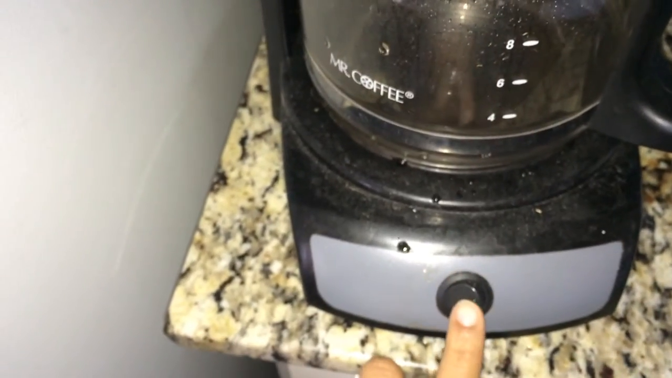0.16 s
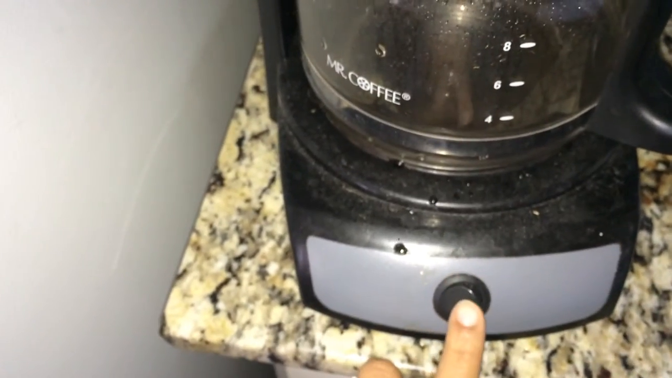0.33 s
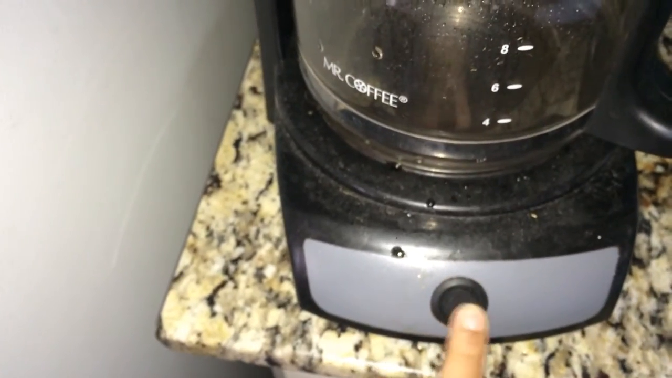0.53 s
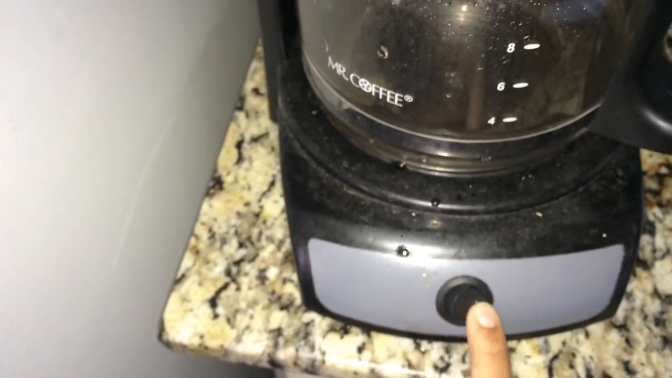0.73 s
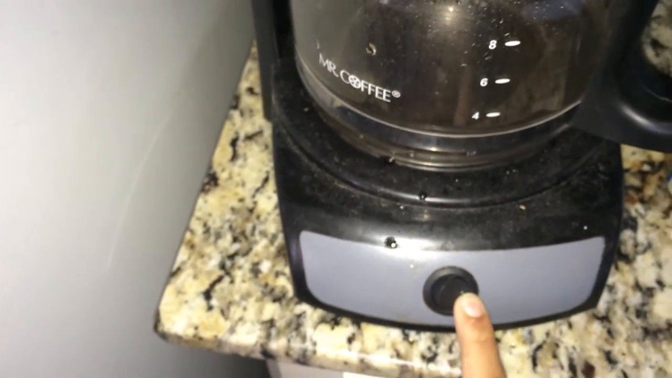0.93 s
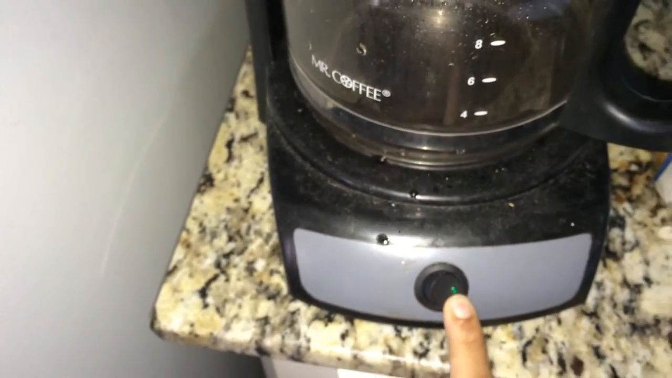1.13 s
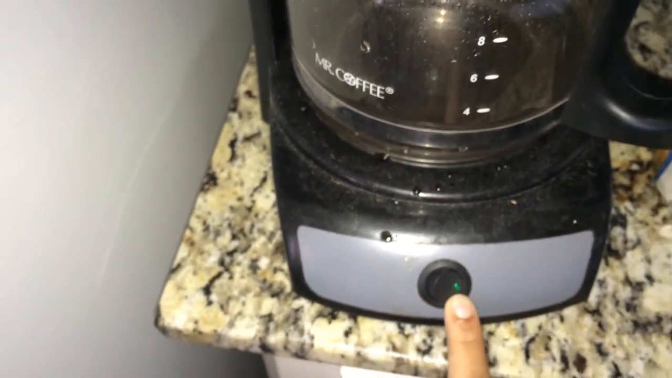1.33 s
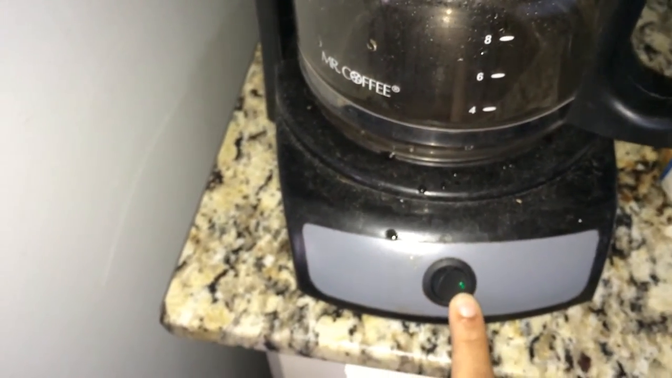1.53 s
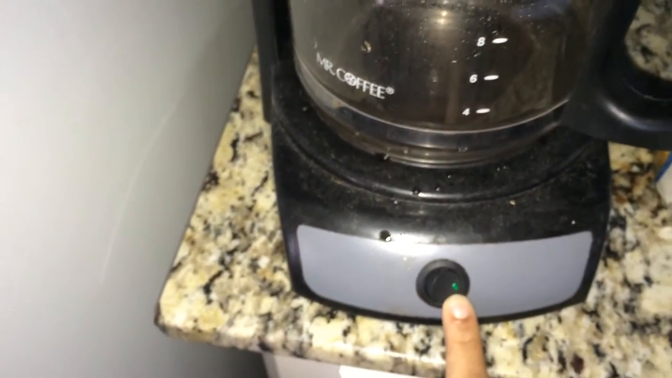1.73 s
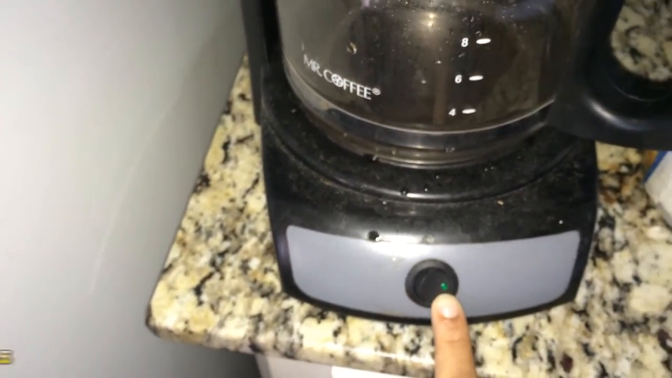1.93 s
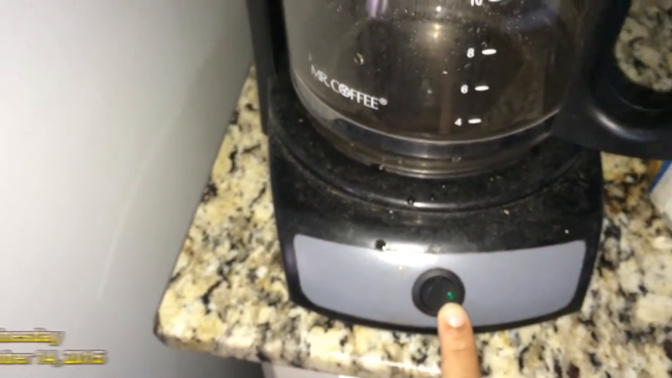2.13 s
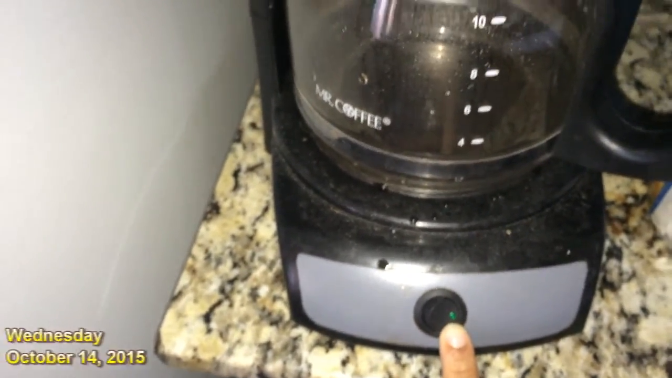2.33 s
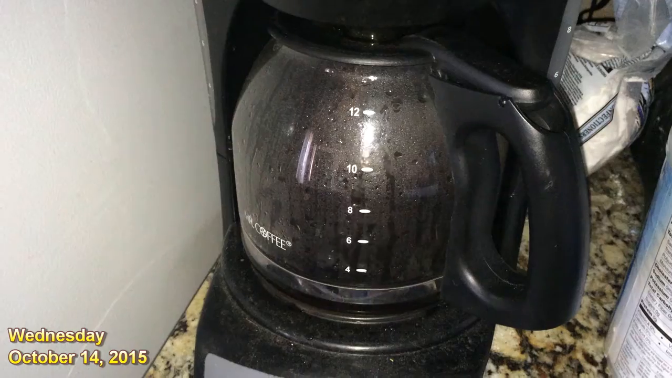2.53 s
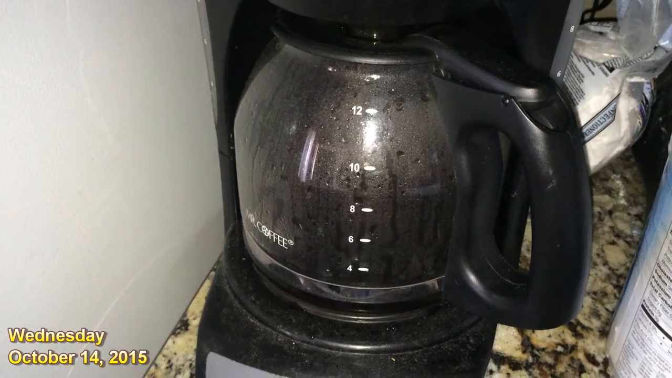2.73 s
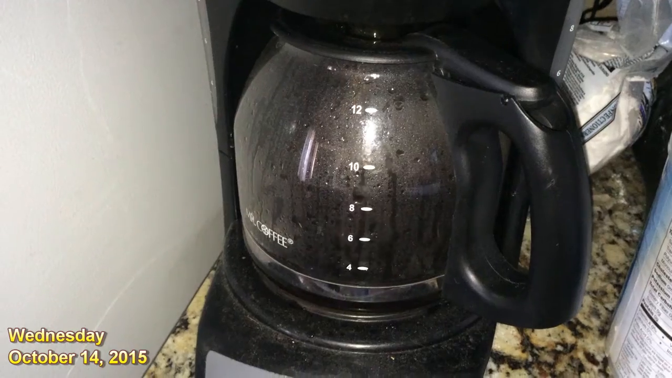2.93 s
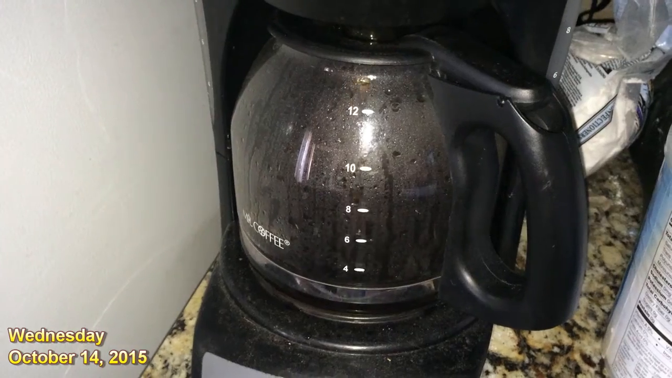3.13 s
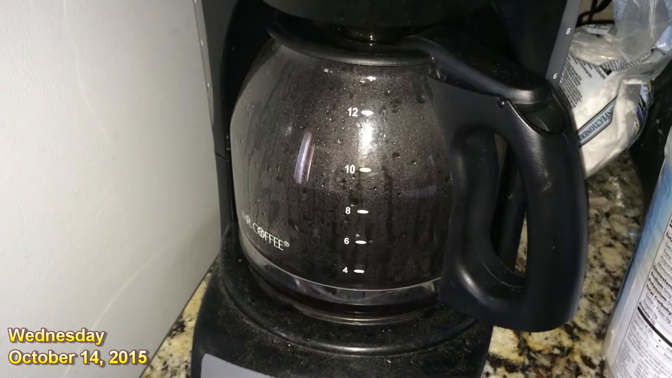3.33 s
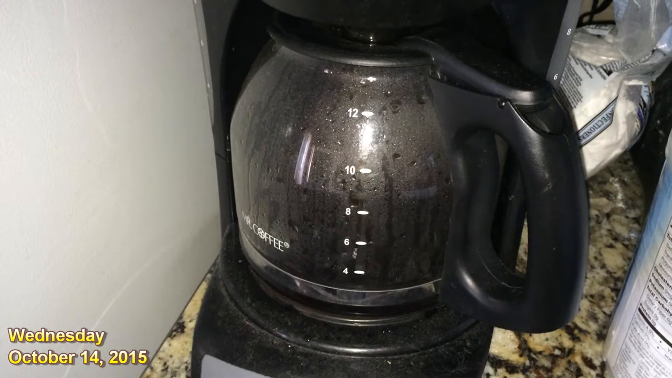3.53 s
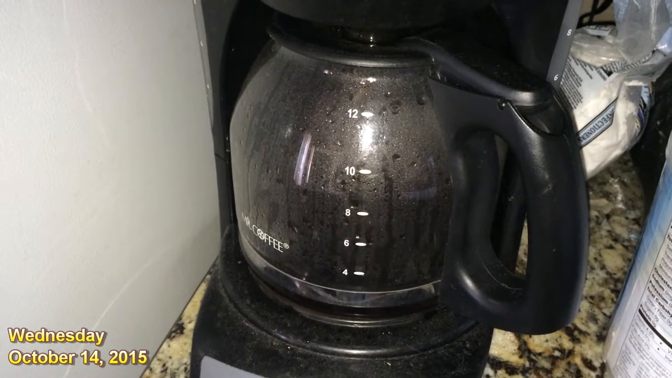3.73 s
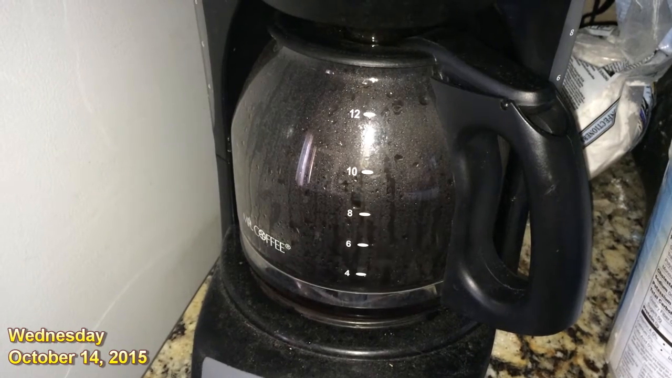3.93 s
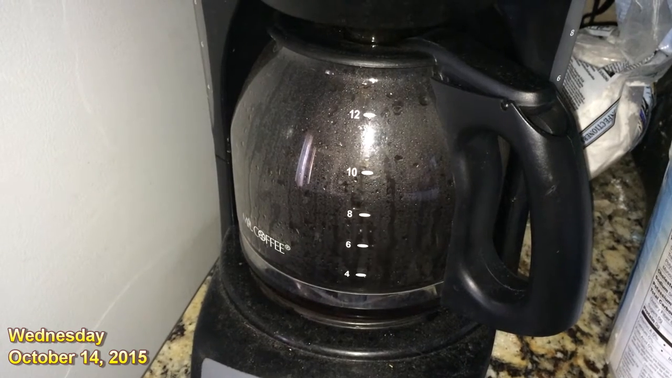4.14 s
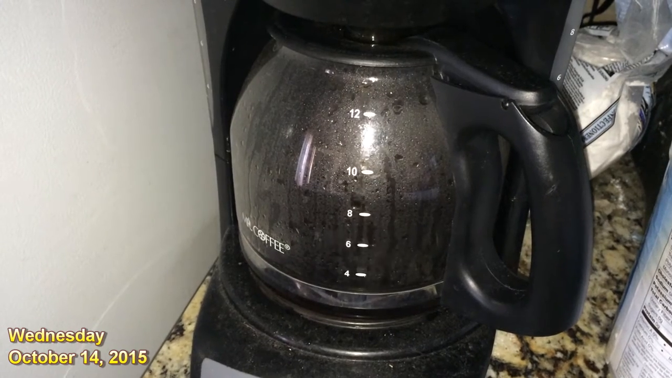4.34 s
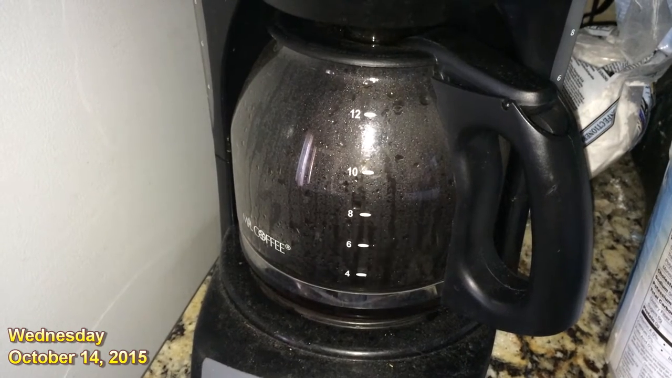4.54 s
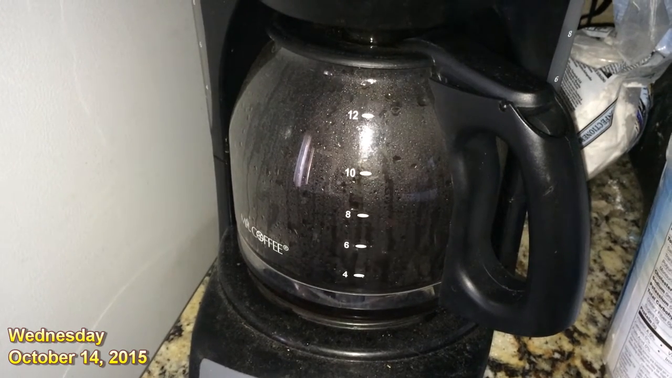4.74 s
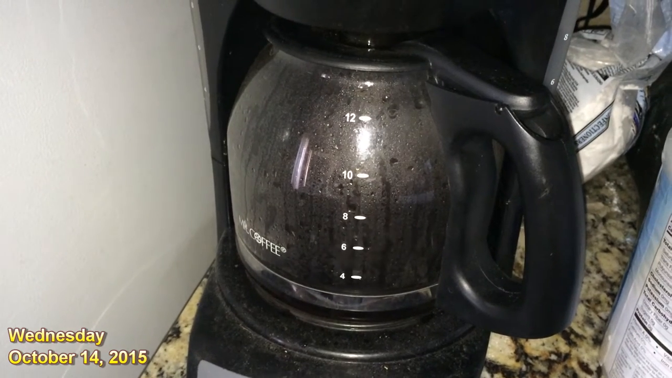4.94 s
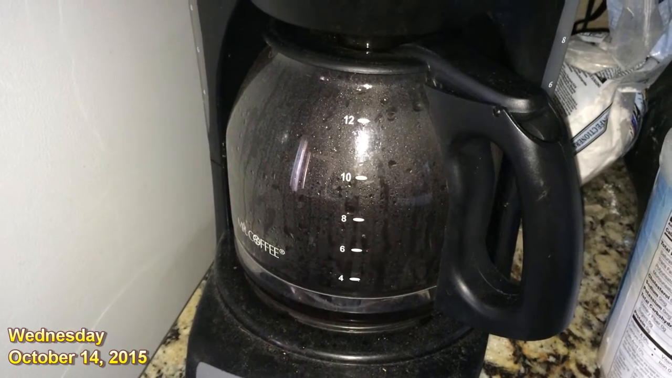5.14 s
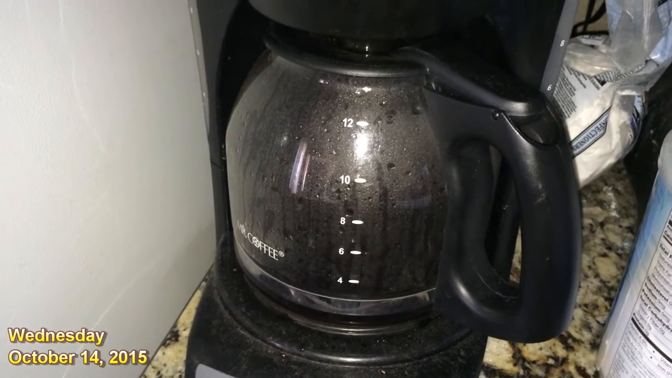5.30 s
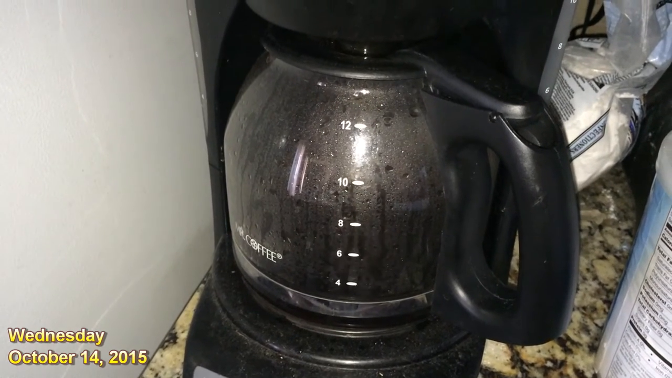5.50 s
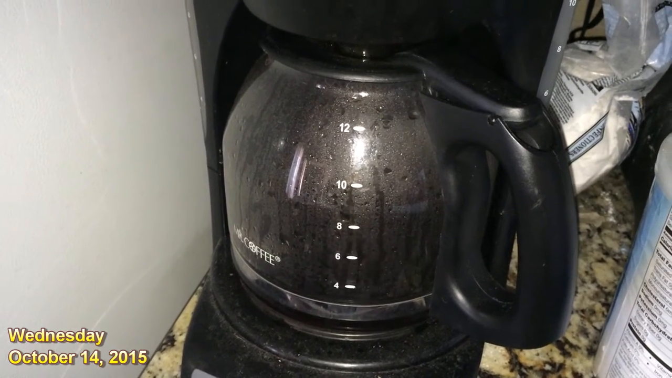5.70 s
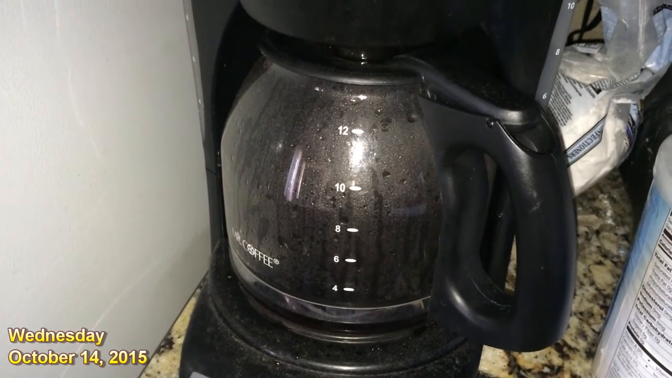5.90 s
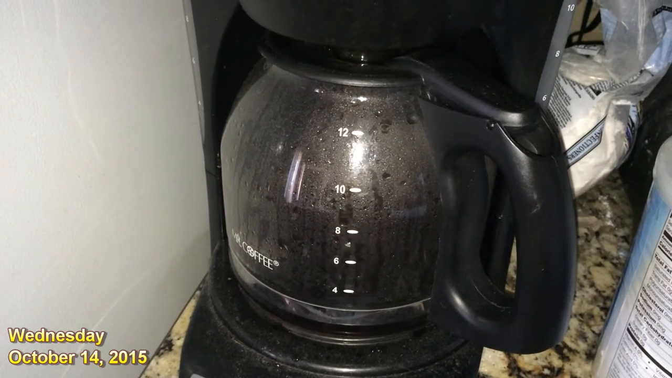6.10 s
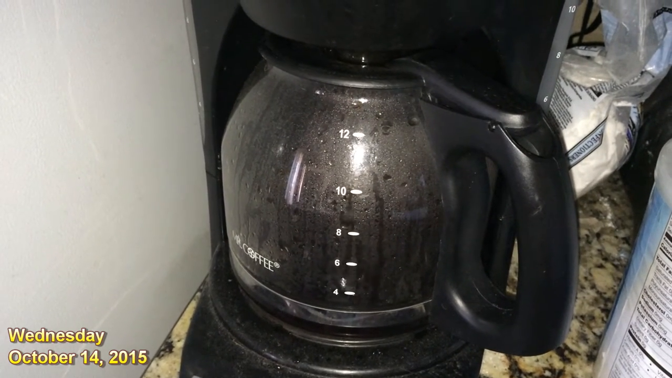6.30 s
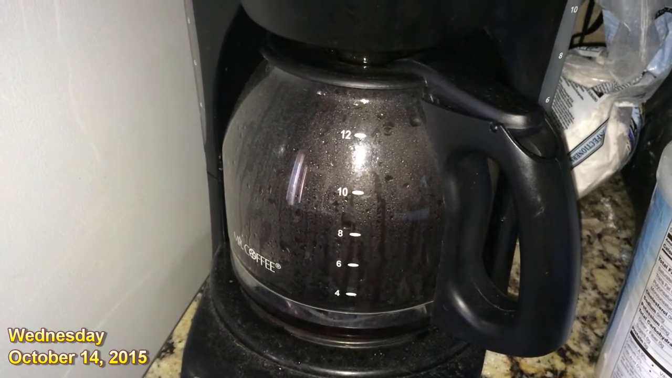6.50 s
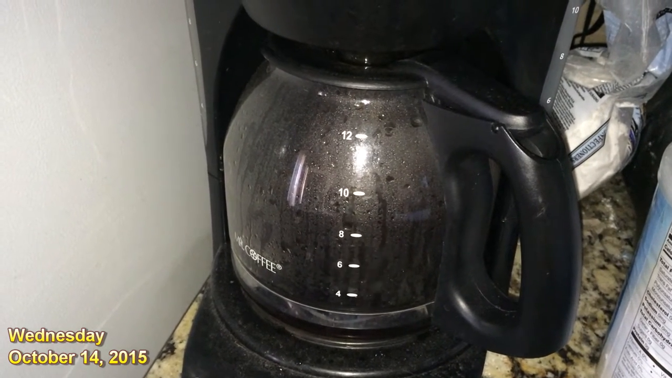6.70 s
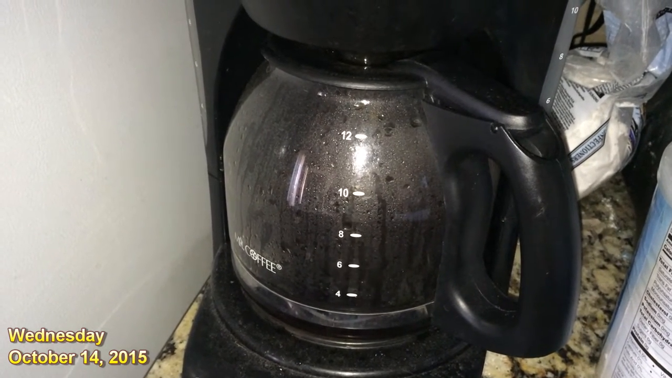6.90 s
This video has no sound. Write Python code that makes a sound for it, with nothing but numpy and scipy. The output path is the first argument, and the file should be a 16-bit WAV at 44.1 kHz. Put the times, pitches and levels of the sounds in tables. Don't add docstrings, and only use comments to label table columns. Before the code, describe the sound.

A plastic switch creaks and snaps loudly in a quiet humming kitchen, then a coffee maker gurgles, spits steam and drips into a glass carafe.

```python
import sys
import numpy as np
from scipy import signal
from scipy.fft import rfft, irfft
from scipy.io import wavfile

SR = 44100
rng = np.random.default_rng(int(sys.argv[2]) if len(sys.argv) > 2 else 0)


def level_to_linear(level):
    exponent = np.asarray(level, float) / 20
    return 10 ** exponent


def to_wav(sig):
    pcm = np.clip(np.atleast_2d(sig), -1, 1) * 32767
    pcm = np.round(pcm).astype(np.int16)
    wavfile.write(sys.argv[1], SR, pcm.T)


N = 306936


def curve(rows):
    s, value = np.transpose(rows)
    return np.interp(np.arange(N) / SR, s, value)


def rms_one(x):
    return x / np.sqrt(np.mean(x ** 2) + 1e-20)


def peak_one(x):
    return x / abs(x).max()


def add(out, s, sound):
    i = round(s * SR)
    out[i:i + len(sound)] += sound[:N - i]


def lasting(events, value):
    return [(*row, value) for row in events]


def drift(rate):
    r = np.exp(-80 * np.pi * rate / SR)
    draw = rng.standard_normal(N // 40 + 2002)
    slow = signal.lfilter([1], [1, -2 * r, r * r], draw)[2000:]
    return np.interp(np.arange(N) / 40, np.arange(len(slow)), rms_one(slow))


def resonate(x, hz, width_hz):
    r = np.exp(-np.pi * width_hz / SR)
    poles = [1, -2 * r * np.cos(2 * np.pi * hz / SR), r * r]
    return signal.lfilter(np.array([1, 0, -1]) * (1 - r * r) / 2, poles, x)


def modes_of(x, modes):
    return sum((-1) ** k * level_to_linear(db) * resonate(x + 1e-18, hz, w) for k, (hz, w, db) in enumerate(modes))


def shaken(x, modes, spread_db):
    strengths = spread_db * rng.standard_normal(len(modes))
    out = 0
    for k, (hz, w, db) in enumerate(modes):
        out = out + (-1) ** k * level_to_linear(db + strengths[k]) * resonate(resonate(x, hz, w), hz, w)
    return out


def coloured(spectrum, patchy_db):
    hz = np.arange(N // 2 + 1) * SR / N + 1
    corner_hz, db = np.transpose(spectrum)
    shaped = rfft(rng.standard_normal(N)) * level_to_linear(np.interp(np.log(hz), np.log(corner_hz), db))
    octave = np.log2(hz / 60).clip(0, 8)
    out = 0
    for k in range(9):
        band = irfft(shaped * (1 - abs(octave - k)).clip(0), N)
        out = out + band * level_to_linear(patchy_db * drift(13.0))
    return rms_one(out)


def puff(length, rough):
    t = np.arange(3600) / SR
    noise, lumps = rng.standard_normal((2, len(t)))
    grain = noise * np.exp(rough * lumps) / np.exp(rough ** 2)
    return grain * (1 - np.exp(-t / 0.00015)) * np.exp(-t / max(length, 5e-4))


def bursts(events, sharpness, gain_db, broad_db):
    out = np.zeros(N)
    for s, db, hz, length in events:
        air = puff(length, rough=0.093)
        body = resonate(resonate(air, hz, hz / sharpness), hz, hz / sharpness)
        broad = resonate(air, hz, 2.0 * hz)
        add(out, s, level_to_linear(db + gain_db) * (peak_one(body) + level_to_linear(broad_db) * peak_one(broad)))
    return out


# frequency in Hz, level in dB per Hz.
ROOM_TONE = [(15, -51.5), (25, -17), (87, -9), (108, -9.5), (145, -6), (166, -5), (200, -10.5), (344, -7),
             (439, -14), (476, -5.5), (560, -20), (1160, -20), (1560, -35), (14800, -47.5), (16000, -67.5)]
# frequency in Hz, width in Hz, level in dB.
FRIDGE = [(120.6, 110, -65), (176.7, 8.9, -59), (286.8, 26, -58), (470.4, 3.8, -62), (944, 3.9, -71),
          (1211, 110, -67), (1530, 710, -71.5), (3400, 160, -88), (6170, 200, -84.5), (7320, 190, -84.5),
          (8710, 200, -88)]
# time in seconds, gain in dB.
GAIN = [(0, 3), (2.5, 1.5), (2.6, 0), (3.1, 9), (3.6, 11.5), (4.7, 10.5), (5.5, 8.5), (6.96, 8)]
ROOM_DB = -52.5
MOTOR_HZ, MOTOR_DB = 117.6, -56


def room_tone():
    hum = 0
    for hz, width_hz, db in FRIDGE:
        line = resonate(resonate(rng.standard_normal(N), hz, width_hz), hz, width_hz)
        hum = hum + level_to_linear(db) * rms_one(line)
    motor = level_to_linear(MOTOR_DB) * np.sqrt(2) * np.sin(2 * np.pi * MOTOR_HZ * np.arange(N) / SR)
    return level_to_linear(curve(GAIN)) * (level_to_linear(ROOM_DB) * coloured(ROOM_TONE, patchy_db=1.5) + hum + motor)


def kitchen():
    t60_s, tail_db = 0.1184, -11
    t = np.arange(SR // 3) / SR
    tail = rng.standard_normal((2, len(t))) * level_to_linear(-60 * t / [[t60_s], [0.61 * t60_s]])
    tail = signal.lfilter([.4], [1, -.7], tail[0]) + tail[1]
    response = level_to_linear(tail_db) * tail * (t > .004) / np.sqrt(np.sum(tail ** 2))
    response[0] = 1
    for s, db in [(.0052, -14.5), (.0095, -15.5), (0.013, -36.5)]:
        response[round(s * SR)] += level_to_linear(db)
    return response


# start in seconds, peak in dB, centre in Hz, length in seconds.
RUSTLES = [
    (0.4294, -58, 1812, 0.024),
    (1.9655, -52, 2100, 0.027),
    (1.968, -58, 3800, 0.02),
]
GRAINS = [(1.966, -49, 1750, 0.015), (1.968, -56, 3080, .005), (1.969, -58, 4900, .004),
          (1.985, -58, 4500, .012), (2.005, -49, 1890, .005), (2.742, -30, 654, 0.0075),
          (2.961, -31, 2050, 0.0042), (4.086, -27, 950, 0.0045), (5.179, -26, 3000, .005),
          (5.69, -34, 1510, .004), (6.634, -31, 1260, 0.0046), (6.7115, -23, 720, .008),
          (7.3, -26, 1244, 0.0088), (6.81, -29.5, 1284, 0.0048)]


def rustles_and_grains():
    hand = bursts(RUSTLES, 0.97, gain_db=1.3, broad_db=-30)
    return hand + bursts(GRAINS, 4.7, gain_db=-.3, broad_db=-22)


# start in seconds, peak in dB, contact length in seconds.
SWITCH = [
    (0.6872, -29, 0.0014),
    (0.7052, -42, .0015),
    (0.7135, -33, .0013),
    (0.725, -43, .0015),
    (0.736, -42, 0.0015),
    (0.7465, -48, .001),
    (0.7476, 1, 0.002),
    (0.948, -54, 0.0025),
]
# frequency in Hz, width in Hz, level in dB.
SWITCH_MODES = [(385, 39, 2.5), (776, 460, -14), (1150, 400, -2.5), (1415, 87, 14), (2080, 470, 5),
                (3250, 797, 2.5), (4600, 700, 1), (6150, 630, 4.5), (8400, 2200, 1.5), (12500, 3800, -10)]
SNAP_S = SWITCH[-2][0]


def switch():
    creaks, snap = np.zeros((2, N))
    for s, db, length in SWITCH:
        contact = modes_of(puff(length, rough=0.67), SWITCH_MODES)
        add(snap if s == SNAP_S else creaks, s, level_to_linear(db) * peak_one(contact))
    return creaks, snap


# frequency in Hz, level in dB per Hz.
SNAP_TAIL = [(180, -31.5), (300, -4), (788, -15.5), (1490, -12.5), (1730, -12), (4300, -16.5),
             (8460, -17.5), (15000, -27.5)]


def snap_tail():
    age = (np.arange(N) / SR - SNAP_S).clip(0)
    decay = level_to_linear(-13.5 - 1364 * age) + level_to_linear(-32.5 - 250 * age) + level_to_linear(-56.0 - 100 * age)
    return coloured(SNAP_TAIL, patchy_db=3.2) * (age > .002) * decay


# start in seconds, peak in dB, centre in Hz, length in seconds.
PANEL = [
    (0.6885, -37.5, 594, 0.0039),
    (0.689, -38, 1790, .003),
    (0.7125, -42.5, 700, .005),
    (0.742, -41.5, 1200, 0.0033),
    (0.7482, -6, 3305, .0012),
    (0.7484, -12.5, 12000, .001),
    (0.7495, -10.5, 1150, 0.00091),
]


def panel():
    return bursts(PANEL, 2.8, gain_db=-0.33, broad_db=-2.0)


# time in seconds, level in dB.
FROTH = [(2.6, -51.5), (2.74, -62), (2.9, -70), (3.1, -53), (3.55, -49), (3.9, -50), (4.0, -50),
         (4.35, -56), (4.7, -59), (6.0, -60), (6.5, -79), (6.78, -55), (6.96, -60)]
FROTH_PER_S, FROTH_CYCLES = 580, 7.1


def froth():
    born = rng.random(N) < FROTH_PER_S * level_to_linear(4.0 * drift(9)) / SR
    strength = rng.standard_normal(N) * level_to_linear(1.4 * rng.exponential(1, N).clip(0, 4))
    pitch = rng.integers(0, 10, N)
    rings = 0
    for k, hz in enumerate(np.geomspace(900, 4000, num=10)):
        rings = rings + resonate(born * strength * (pitch == k) + 1e-18, hz, hz / FROTH_CYCLES)
    return level_to_linear(curve(FROTH)) * rms_one(rings)


# start in seconds, peak in dB, centre in Hz.
SPLASHES = [(2.714, -34, 1250), (2.727, -33, 1450), (2.809, -37, 734), (2.937, -37, 780), (3.002, -50, 708),
            (3.097, -28, 1380), (3.149, -40, 750), (3.318, -27, 810), (6.1394, -32.5, 1220),
            (6.634, -22.5, 860), (6.728, -20.5, 860), (6.731, -22, 1570), (6.759, -40, 1530),
            (6.807, -26.5, 870)]
SPRAY = [(2.623, -43, 2320), (2.6426, -32.5, 2370), (2.7135, -42, 3200), (2.7222, -30, 2090),
         (2.7344, -20.5, 2010), (2.7453, -28, 1940), (2.8397, -38.5, 3560), (2.8736, -46, 2360),
         (2.9654, -27, 3000), (3.0044, -35, 2430), (3.062, -32, 2110), (3.0794, -35, 2650),
         (3.1148, -27, 1820), (3.5608, -19, 2060), (4.5173, -21.5, 1950), (4.793, -31, 3400),
         (5.1325, -39, 3120), (5.606, -36.5, 3700), (6.1385, -36.5, 1810), (6.187, -32, 2460),
         (6.246, -50, 1780), (6.317, -41, 3730), (6.5217, -27, 1830), (6.5523, -36, 1840),
         (6.6235, -30, 2140), (6.7203, -27.5, 2170), (6.74, -30, 2000), (6.8055, -25.5, 1770),
         (6.8174, -28, 2670), (6.8494, -49, 2800)]
FLECKS = [(2.781, -33.5, 2400), (2.823, -31, 1990), (2.851, -39, 1700), (2.934, -35, 1900),
          (4.791, -37, 1500), (4.894, -50, 2000), (4.956, -40, 2790), (5.056, -49, 2200),
          (5.177, -35, 1900), (5.358, -40, 2000), (6.737, -30, 2600), (6.865, -45, 2900), (6.94, -39, 1100)]
TOUCHES = [(2.744, -30, 3600), (2.875, -33, 7000), (2.96, -40, 5000), (4.72, -46, 2400), (5.126, -29, 4240),
           (5.874, -25, 3500), (6.081, -46, 3000), (6.522, -40, 3670), (6.586, -39, 3600),
           (6.712, -53, 3000), (6.786, -27, 3170), (6.818, -32, 3900)]
SPLASH_S, SPRAY_S, FLECK_S, TOUCH_S = 0.0077, 0.0073, 0.0043, 0.00097


def splashes():
    out = bursts(lasting(SPLASHES, SPLASH_S), 3.5, gain_db=-2.7, broad_db=-27)
    out += bursts(lasting(SPRAY, SPRAY_S), 3.6, gain_db=-0.71, broad_db=-11.0)
    out += bursts(lasting(FLECKS, FLECK_S), 2.0, gain_db=-1.5, broad_db=-3)
    return out + bursts(lasting(TOUCHES, TOUCH_S), 1.5, gain_db=-0.33, broad_db=-14)


# frequency in Hz, width in Hz, level in dB.
CARAFE = [(1530, 14.5, 10.5), (2300, 140, 6.5), (3000, 120, 0.5), (3800, 82, 8.5)]


def drops(rows, tick_db):
    t = np.arange(2600) / SR
    out, ticks = np.zeros((2, N))
    for s, db, hz, cycles, glide in rows:
        age = t * hz / (.3 * max(cycles, 1))
        phase = 2 * np.pi * np.cumsum(hz * (1 + glide * (np.minimum(age, 4) - 1))) / SR
        throb = 1 + .5 * np.cos(2 * np.pi * (t / 0.0066 + rng.random()))
        afterring = 0.26 * np.tanh(age) * np.exp(-t / 0.011) * throb
        swell = age ** 2 * np.exp(2 - 2 * age) + afterring
        add(out, s, level_to_linear(db) * swell * np.sin(phase))
        add(ticks, s, level_to_linear(db + tick_db) * puff(0.0014, rough=0.75))
    ticks = resonate(ticks + 1e-18, 1600, 2600)
    return out + ticks + modes_of(out + 3.6 * ticks, CARAFE)


# start in seconds, peak in dB, pitch in Hz, length in cycles.
DROPS = [(2.614, -28, 1076, 4.1), (2.6444, -21.5, 1330, 3.8), (2.841, -30.5, 1185, 2.3),
         (3.044, -31.5, 1060, 7.7), (3.1156, -34, 870, 6), (3.1894, -21, 1890, 6.5),
         (3.3144, -26.5, 2060, 11), (3.415, -26.5, 1370, 8.9), (3.473, -11, 1040, 7.9),
         (4.7212, -13, 1170, 5.4), (4.7927, -23, 2750, 13.5), (5.127, -22.5, 1317, 6.9),
         (5.1776, -32, 2900, 5), (5.227, -34, 2270, 6), (5.3696, -29, 4200, 9.2), (5.413, -39, 1560, 5.2),
         (5.6343, -39, 3800, 9.2), (5.688, -30, 1817, 3.9), (5.8017, -31.5, 2080, 2.9),
         (5.875, -19, 2437, 6.4), (6.0387, -39, 2260, 9.5), (6.0819, -17, 1154, 6.2),
         (6.1863, -38, 2270, 2), (6.5231, -23, 1576, 2.7), (6.552, -29, 860, 4.6), (6.5864, -21, 1850, 7.5),
         (6.6633, -36.5, 1410, 4.2), (6.7458, -20, 1530, 5.9), (6.788, -24.5, 2300, 4.9),
         (6.9217, -42, 1530, 8.3)]
SMALL_RINGS = [(3.658, -28, 3250, 29), (3.819, -34.5, 3360, 12), (3.883, -23.5, 3360, 21),
               (3.907, -23, 3250, 13), (4.086, -46, 3030, 20), (4.117, -28, 2210, 14), (4.283, -45, 3000, 15),
               (4.347, -25.5, 2240, 9.1), (5.134, -43, 2900, 37), (5.431, -37, 1630, 8.5),
               (6.04, -48, 2730, 7.4), (6.149, -36, 2470, 3.4), (6.187, -42, 3140, 8.1),
               (6.821, -34.5, 2855, 17), (6.857, -44, 2240, 11)]
# start in seconds, peak in dB, pitch in Hz, length in seconds.
GLASS_RINGS = [(2.648, -37.5, 1530, 0.018), (4.728, -44, 1530, 0.011), (5.135, -45, 1530, 0.019),
               (5.693, -46, 1885, 0.032), (5.88, -44, 2430, 0.01), (6.088, -48, 1530, .012),
               (6.528, -39, 1530, .015), (6.752, -27, 1530, .022)]
DROP_GLIDE = 0.0174


def dripping():
    growing = (2.9585, -19, 3500, 9, -.055)
    out = drops(lasting(DROPS, DROP_GLIDE) + [growing], tick_db=-13.0)
    out += drops(lasting(SMALL_RINGS, DROP_GLIDE), tick_db=-7)
    return out + bursts(GLASS_RINGS, 39.0, gain_db=-.3, broad_db=-30)


# start in seconds, peak in dB, centre in Hz.
SPITS = [(2.644, -38, 4070), (2.9584, -38, 3990), (3.0016, -30.5, 8260), (3.1363, -41, 10760),
         (3.1749, -4, 4100), (3.196, -24, 4670), (3.224, -15, 4800), (3.4515, -22, 4600),
         (4.7896, -24, 11980), (5.1818, -29, 8160), (5.875, -34, 7140), (6.1414, -15.5, 10300),
         (6.537, -33.5, 10000), (6.6288, -32.5, 9100), (6.7735, -35, 10300)]
PINGS = [(2.8749, -39, 7800), (3.0347, -29.5, 8400), (3.9494, -27.5, 7300), (4.9551, -27, 6300),
         (5.0549, -26, 6830), (5.177, -30, 8200), (5.6066, -29.5, 7960), (5.8946, -32, 7050),
         (6.2701, -35, 8140)]
SPUTTERS = [(3.192, -24, 3600), (3.212, -25, 3530), (3.236, -28, 3900), (3.255, -33, 3500),
            (3.29, -40, 3800), (3.332, -31.5, 3600), (3.362, -31, 4000), (3.395, -34, 4200),
            (3.44, -29, 4020)]
WHISTLES = [
    (3.196, -23, 4600, 0.051),
    (3.413, -27.5, 4800, 0.037),
    (3.44, -42, 4900, 0.018),
]
SPIT_S, PING_S, SPUTTER_S = 0.0027, 0.0045, 0.022


def spitting():
    out = bursts(lasting(SPITS, SPIT_S), 1.6, gain_db=-2, broad_db=-12)
    out += bursts(lasting(PINGS, PING_S) + WHISTLES, 7, gain_db=-2, broad_db=-8)
    return out + bursts(lasting(SPUTTERS, SPUTTER_S), 0.97, gain_db=-1.0, broad_db=3.2)


# time in seconds, level in dB.
STEAM = [
    [(2.6, -61), (2.664, -61), (2.784, -54), (2.838, -58), (3.17, -49)],
    [(3.18, -30), (3.21, -35.5), (3.34, -36.5), (3.68, -43.5), (4.06, -45.5), (4.97, -45), (5.38, -48.5),
     (6.15, -52), (6.3, -53.5), (6.96, -54)],
]
# frequency in Hz, level in dB per Hz.
STEAM_COLOUR = [(710, 1.5), (1200, -7), (1440, -6.5), (1850, 1), (2150, -8.5), (3290, -5.5), (4800, -2.5),
                (5530, -4.5), (6370, 0), (11200, -5), (14000, -9), (15300, -6), (16000, -45)]
# frequency in Hz, width in Hz, level in dB.
JET_BANDS = [(4800, 310, -1), (6690, 660, 7.5), (7190, 56, 3)]
# frequency in Hz, width in Hz.
LID_NOTCHES = [(8450, 190), (11100, 570), (13350, 170), (14800, 270)]
# start in seconds, level in dB over the leak.
GASPS = [
    (2.724, -6),
    (2.863, 9),
    (2.958, 12.5),
    (3.034, 6),
    (3.135, 5),
]
# start in seconds, peak in dB, centre in Hz, length in seconds.
BURST_EDGE = [
    (3.1752, -12.5, 8100, 0.0045),
    (5.178, -33, 12500, 0.0063),
]
GASP_S, JET_SETTLES_S = 0.017, 0.72
CRACKLES_PER_S, CRACKLE_DB = 1000, -9.5
NOTCH_DEPTH = 0.72


def steam():
    jet, t = coloured(STEAM_COLOUR, patchy_db=1.54), np.arange(N) / SR
    strength = rng.standard_normal(N) * level_to_linear(0.97 * rng.exponential(1, N).clip(0, 4))
    droplets = (rng.random(N) < CRACKLES_PER_S / SR) * strength
    jet = jet + level_to_linear(CRACKLE_DB) * rms_one(resonate(droplets, 7700, 9000))
    for hz, width_hz in LID_NOTCHES:
        jet = jet - NOTCH_DEPTH * resonate(jet, hz, width_hz)
    opens_s = STEAM[1][0][0]
    settled = 1 - 0.25 * np.exp(-abs(t - opens_s) / JET_SETTLES_S)
    gasp_db = sum(db * (t > s) * np.exp(-((t - s) / GASP_S) ** 2) for s, db in GASPS)
    level = level_to_linear(curve(STEAM[0] + STEAM[1]) + gasp_db + 2.5)
    edge = bursts(BURST_EDGE, 1.3, gain_db=0, broad_db=0.5)
    return level * (jet + settled * modes_of(jet, JET_BANDS)) + edge


# start in seconds, peak in dB, centre in Hz.
BOOMS = [
    (3.562, -24, 109),
    (3.722, -20.5, 207),
    (3.788, -25.5, 115),
    (3.927, -20.5, 134),
    (4.236, -16.5, 208),
    (4.275, -29, 122.5),
    (6.808, -33.5, 215),
]
FURTHER_BOOMS = [(2.838, -35, 218), (2.962, -33, 338), (3.572, -26, 227), (3.794, -17, 139), (4.022, -29, 342),
                 (4.225, -22, 150), (4.268, -24, 122), (4.345, -23, 335), (4.495, -19.5, 316),
                 (6.809, -31, 260)]
BOOM_S = 0.0079


def booms():
    out = bursts(lasting(BOOMS, BOOM_S), 6.7, gain_db=-1.0, broad_db=-18)
    return out + bursts(lasting(FURTHER_BOOMS, BOOM_S * 0.8), 3.6, gain_db=-0.35, broad_db=-25)


# frequency in Hz, width in Hz, level in dB.
THUMP = [(49.6, 26, -15), (125.8, 20.4, -1), (150, 40, -7), (223.8, 24.3, 0.5), (337, 26, -5),
         (410, 150, -35)]
HOLLOW = [(633, 165, 8), (657.8, 120, 13), (892, 49, -7)]
RATTLE = [(1040, 76, -1), (1293, 136, -1.5), (1429, 92, -4)]
CLACK = [(1630, 500, -1.5), (2170, 750, -4), (2627, 88, -3), (2990, 1800, -6), (4600, 6500, -29)]
REBOUND_S, REBOUND_DB = .011, -10


def collapses(rows, length):
    out = np.zeros(N)
    for s, db, thump_db, rattle_db, clack_db in rows:
        families = [(HOLLOW, -1.5, .9), (RATTLE, rattle_db + 3.0, .9), (CLACK, rattle_db + clack_db, 1.1)]
        for lag, loss_db in ((0, 0), (REBOUND_S * rng.uniform(.7, 1.3), REBOUND_DB)):
            thump = modes_of(puff(length * 0.84, rough=0.57), THUMP)
            add(out, s + 1.496 * lag, level_to_linear(db + thump_db + 0.65 * loss_db) * peak_one(thump))
            for modes, extra_db, share in families:
                ring = shaken(puff(length * share, rough=1.0), modes, spread_db=2.5)
                add(out, s + lag - .0015, level_to_linear(db + extra_db + loss_db) * peak_one(ring))
    return out


# start in seconds, hollow in dB, thump in dB over it,
# rattle in dB over it.
KNOCKS = [(2.727, -29, -9, 0.5), (2.811, -42, 5, 3.5), (2.945, -39.5, 4, 0.5), (2.993, -21, -6, -16.5),
          (3.095, -33, -21, -19), (3.187, -59, -12, 4), (3.259, -37.5, 1, -3), (3.324, -33, 8, -1),
          (3.399, -44, 13, 3), (3.505, -36, 14, 2), (4.544, -31, -5, -25), (4.574, -33.5, 4, -6),
          (6.63, -36.5, 0, 2.5), (6.711, -30, -3, -2), (6.81, -34, 5, -5)]
CHUGS = [(3.544, -34.5, 13, -7, 4), (3.56, -21.5, 1, -10, -5), (3.574, -43, -5, 6, 15),
         (3.646, -14, -2, -9.5, 0), (3.678, -11.5, -13, -13, 3), (3.698, -21.5, 5.5, -4.5, 2),
         (3.724, -21.5, 3.5, -9.5, 5.5), (3.779, -17, 3, -13.5, 1), (3.797, -17.5, 0, -14, -4),
         (3.824, -27, -17, -12, -2), (3.839, -13.5, -10, -8, -7), (3.86, -20.5, 5.5, -1, -17),
         (3.88, -18, -12, -19, -3), (3.887, -10, -18, -12, 4.5), (3.906, -18, 3, -7.5, 0),
         (3.925, -16, 1, -5.5, 0), (3.939, -56, 7, -13, -1), (4.021, -21, 5.5, -5.5, 1.5),
         (4.058, -20.5, 3, -20, -5), (4.084, -20, -11, -17, 2), (4.116, -16.5, 0.5, -4, -3),
         (4.131, -19, -2, -14, 4), (4.238, -27, 2, -20, -1), (4.265, -25, 7, -6, 1),
         (4.318, -19, -1.5, -12, 1), (4.339, -18.5, 2, -3, -1), (4.357, -18, -4, -11, -4),
         (4.4295, -18.5, -4.5, -12, -9), (4.452, -18.5, -32, -10, 0), (4.492, -19, -1, -7, -7)]
AFTERCHUGS = [(3.608, -37, 13, -11, 0), (3.624, -27.5, -15, -11, 2), (3.807, -29, -9, -9, -9),
              (4.176, -46, 1, 3, -1), (4.194, -25.5, -3, -21, 5), (4.229, -25, -2, -25, -1),
              (4.283, -27.5, -4, -4, -1), (4.303, -38, 4, 5, 3), (4.372, -43, -9, -11, -3),
              (4.721, -44, 8, 0, -3)]
# time in seconds, level in dB.
SIMMER = [(2.6, -42.5), (2.67, -45), (2.78, -43), (3.63, -32.5), (3.75, -36), (3.92, -48), (4.08, -30),
          (4.25, -36), (4.36, -53), (4.52, -36), (4.75, -46.5), (5.88, -47), (6.74, -48.5), (6.96, -44)]
KNOCK_S, CHUG_S, KNOCK_CLACK_DB = 0.0034, 0.0084, 3


def gurgle():
    out = collapses(lasting(KNOCKS, KNOCK_CLACK_DB), KNOCK_S) + collapses(CHUGS, CHUG_S)
    small = (rng.random((4, N)) < 500 / SR) * rng.standard_normal((4, N)) * level_to_linear(1.4 * drift(23))
    simmer = level_to_linear(curve(SIMMER) + np.array([[36], [24], [22], [12]])) * small
    for row, modes in zip(simmer, (THUMP, HOLLOW, RATTLE, CLACK)):
        out = out + modes_of(row, modes)
    return out


# start in seconds, end in seconds.
CUT_S = (2.4945, 2.6055)


def scene():
    brewing = np.arange(N) > CUT_S[0] * SR
    creaks, snap = switch()
    near = creaks + panel() + rustles_and_grains()
    near += dripping() + splashes() + spitting()
    near += (gurgle() + froth()) * brewing + collapses(AFTERCHUGS, CHUG_S) + booms()
    echoed = signal.oaconvolve(near, kitchen())[:N]
    return (snap + snap_tail() + echoed + steam() * brewing + room_tone())[None]


def band_limit(x):
    return signal.sosfilt(signal.butter(12, 16480, fs=SR, output="sos"), x)


MIC_LOW_HZ, MIC_TOP_HZ = 25.32, 15280


def record(dry):
    t = np.arange(N) / SR
    gap = (t < CUT_S[0]) | (t > CUT_S[1])
    top_edge = signal.ellip(12, .5, 45, MIC_TOP_HZ, fs=SR, output="sos")
    low_edge = signal.butter(2, MIC_LOW_HZ, "high", fs=SR, output="sos")
    band = signal.sosfilt(low_edge, signal.sosfilt(top_edge, dry * gap))
    return band_limit(1.476 * np.tanh(band / 1.77))


dry = scene()
out = record(dry)
to_wav(out)
```